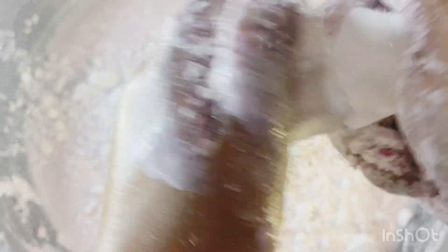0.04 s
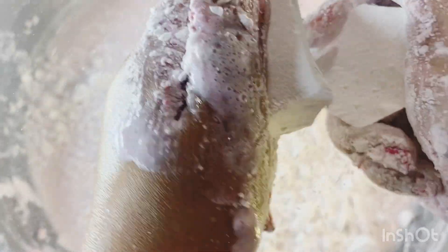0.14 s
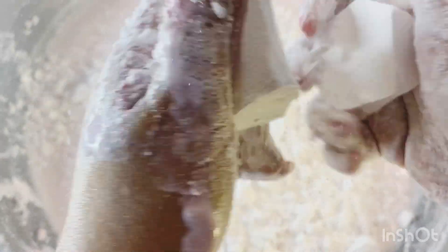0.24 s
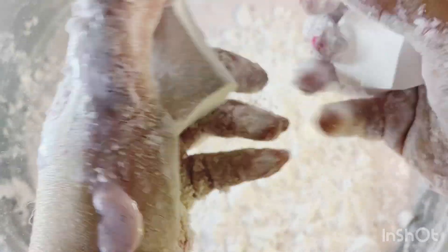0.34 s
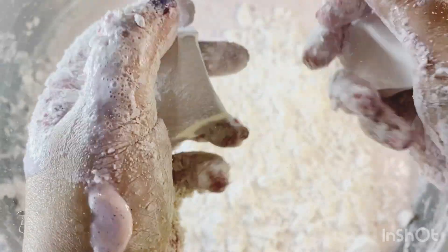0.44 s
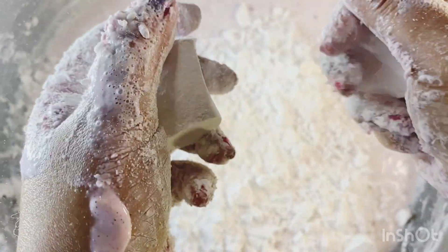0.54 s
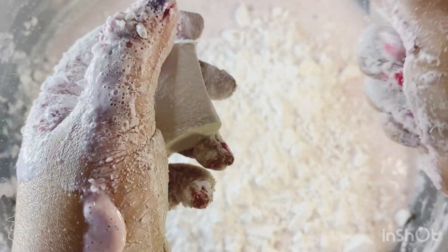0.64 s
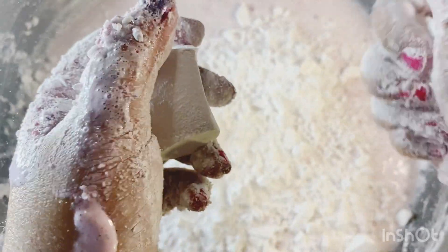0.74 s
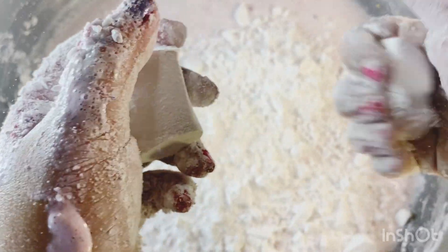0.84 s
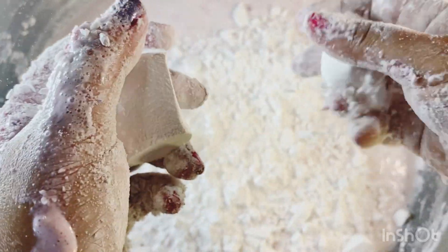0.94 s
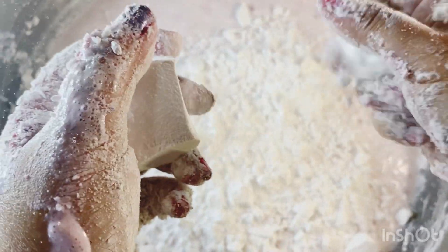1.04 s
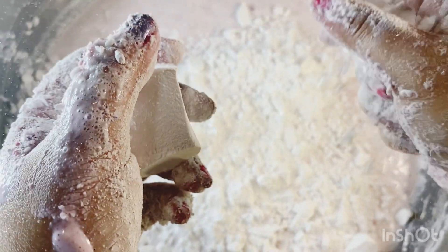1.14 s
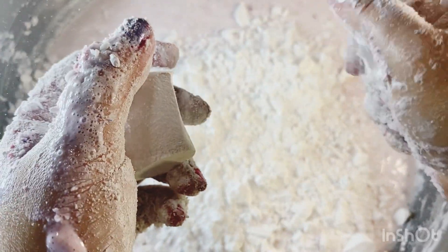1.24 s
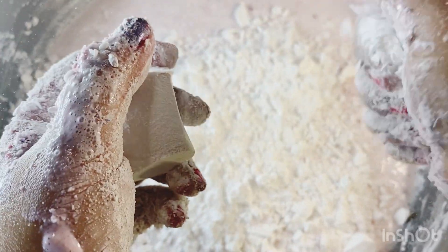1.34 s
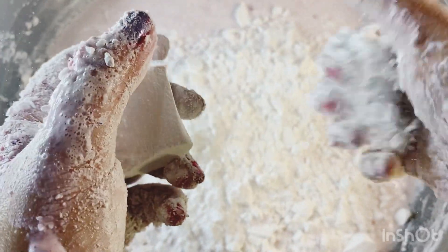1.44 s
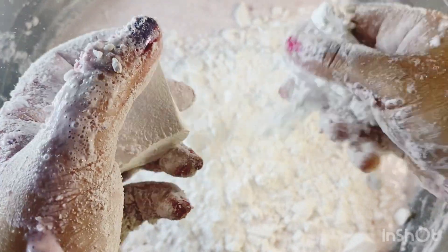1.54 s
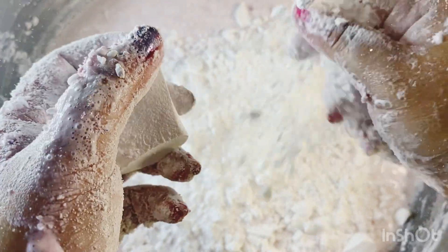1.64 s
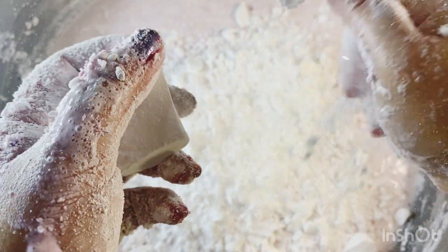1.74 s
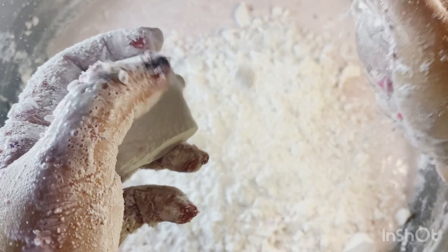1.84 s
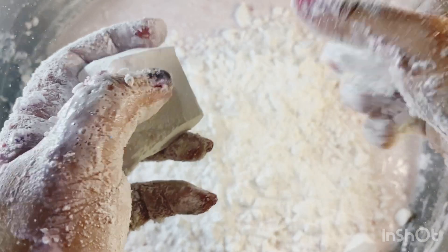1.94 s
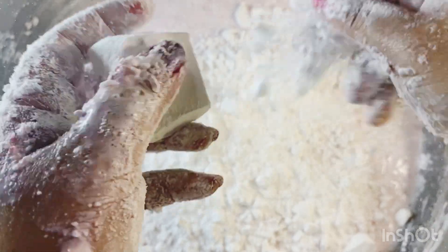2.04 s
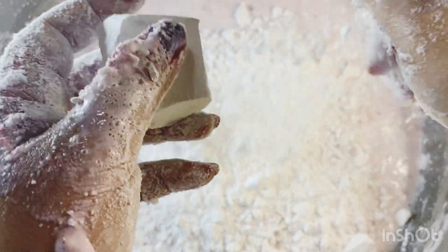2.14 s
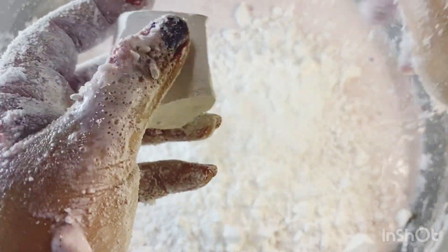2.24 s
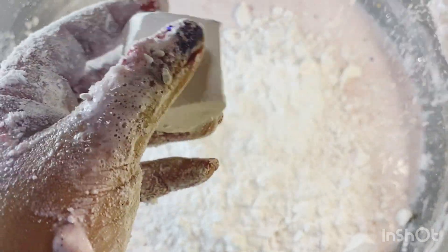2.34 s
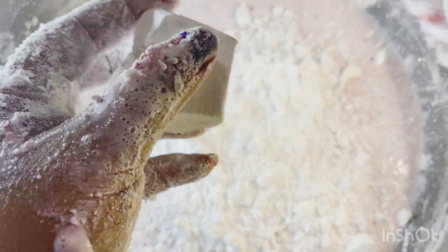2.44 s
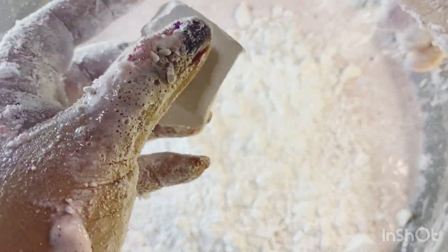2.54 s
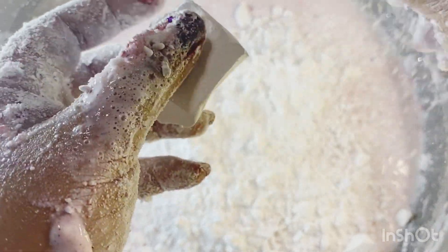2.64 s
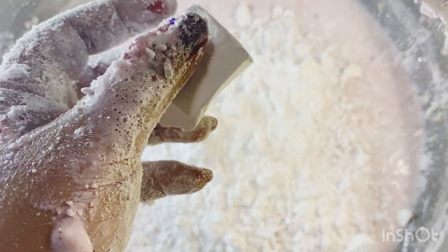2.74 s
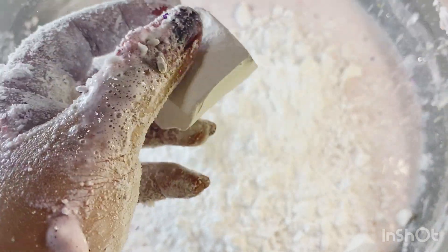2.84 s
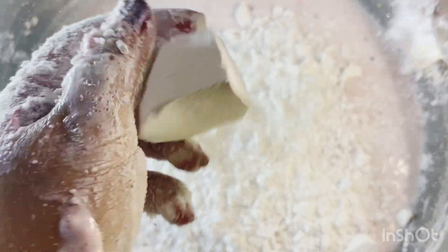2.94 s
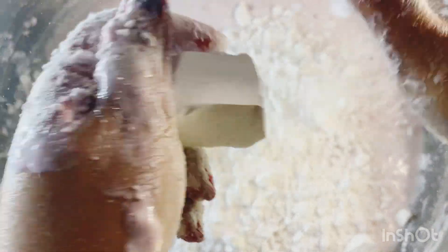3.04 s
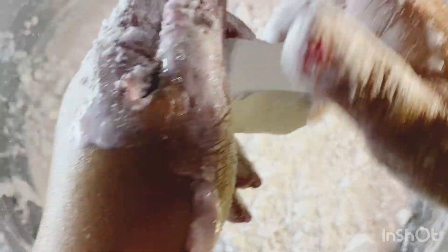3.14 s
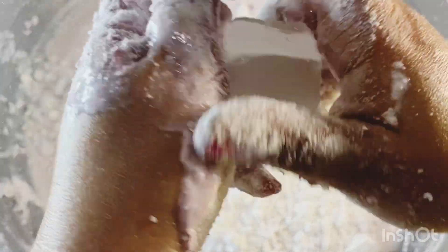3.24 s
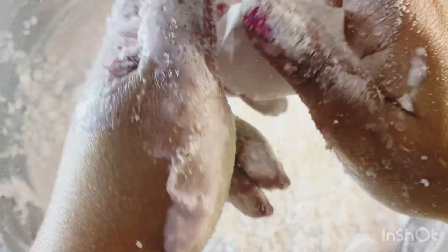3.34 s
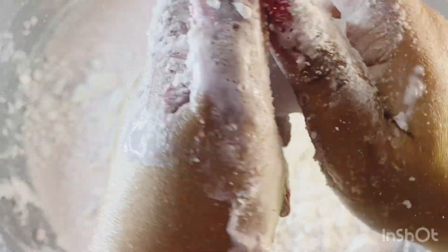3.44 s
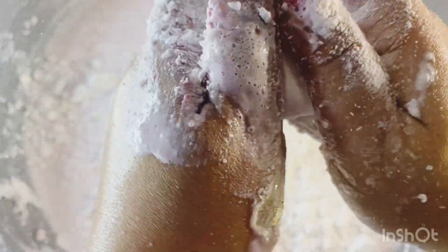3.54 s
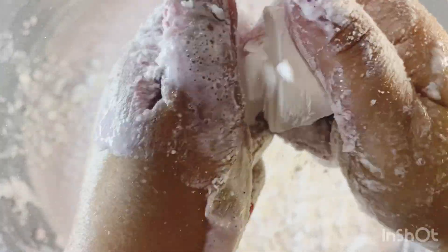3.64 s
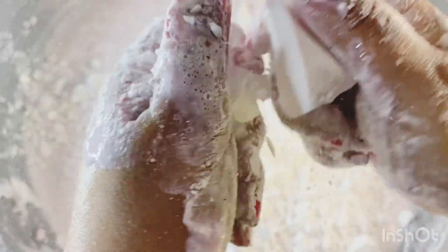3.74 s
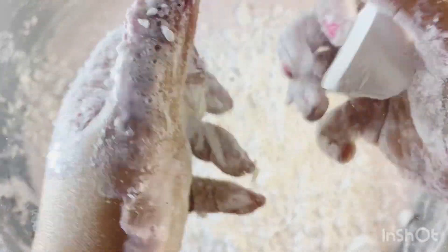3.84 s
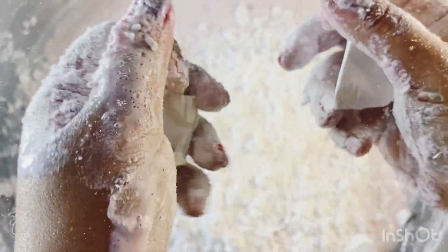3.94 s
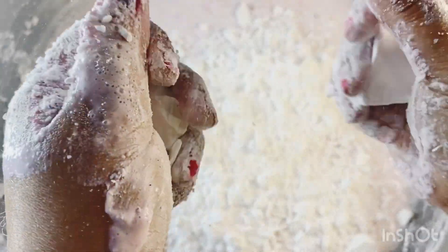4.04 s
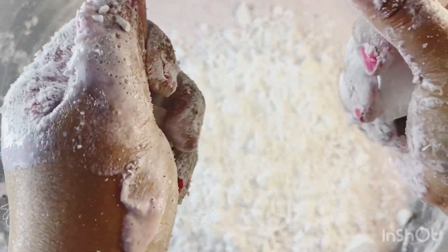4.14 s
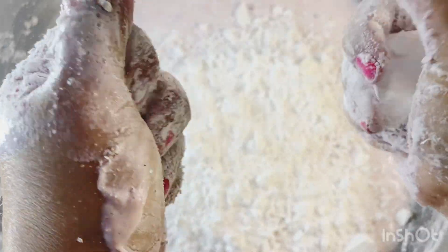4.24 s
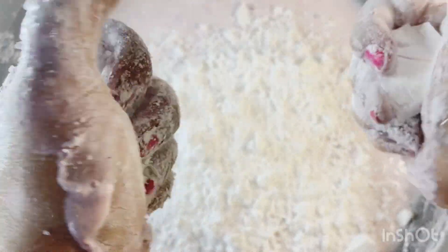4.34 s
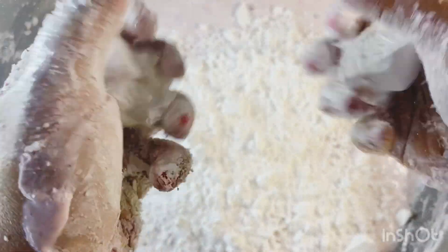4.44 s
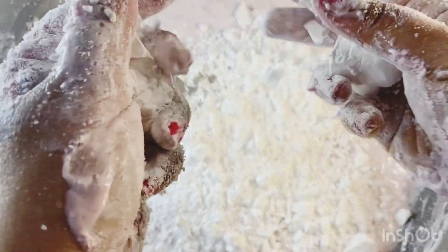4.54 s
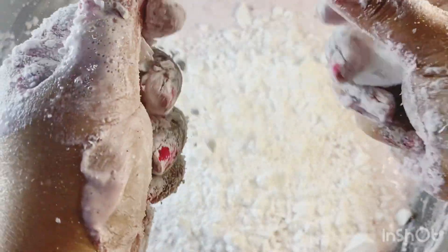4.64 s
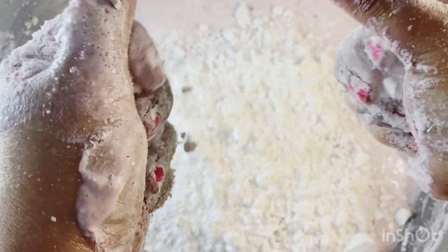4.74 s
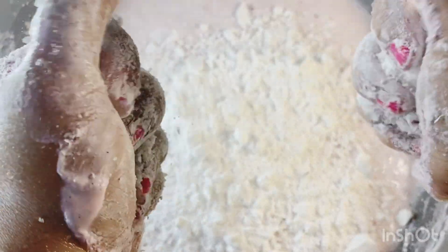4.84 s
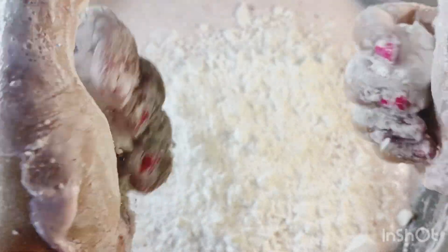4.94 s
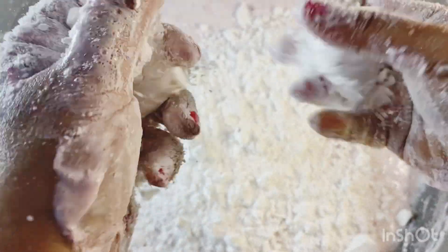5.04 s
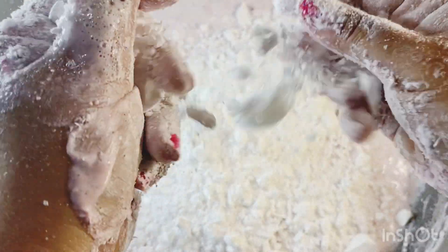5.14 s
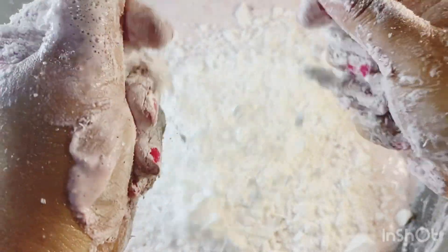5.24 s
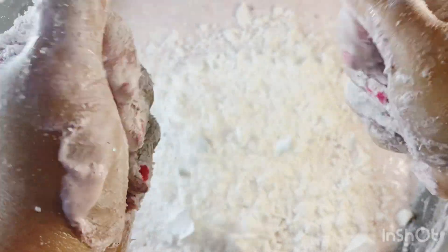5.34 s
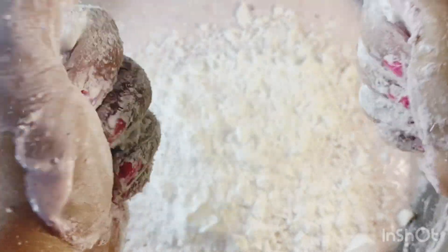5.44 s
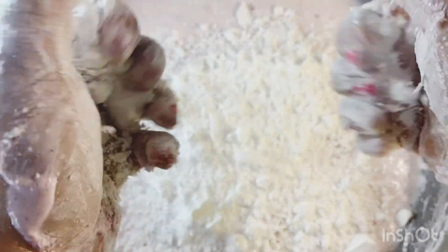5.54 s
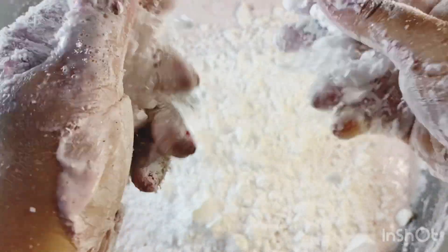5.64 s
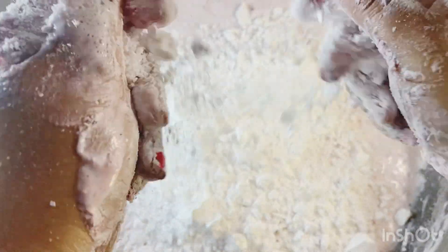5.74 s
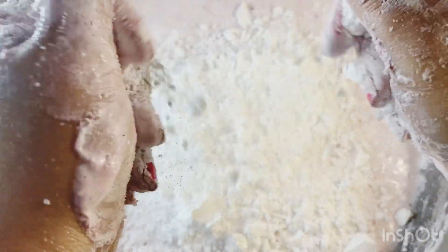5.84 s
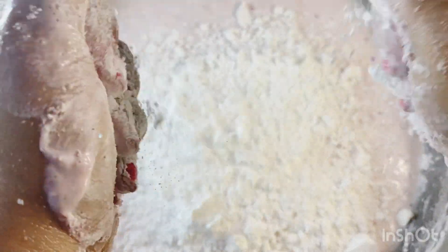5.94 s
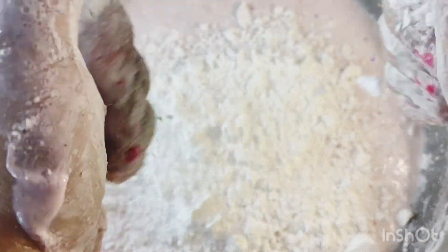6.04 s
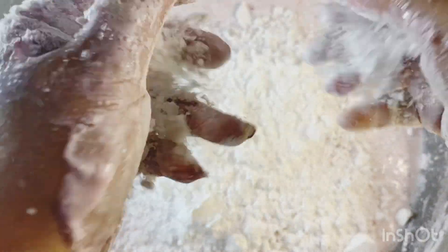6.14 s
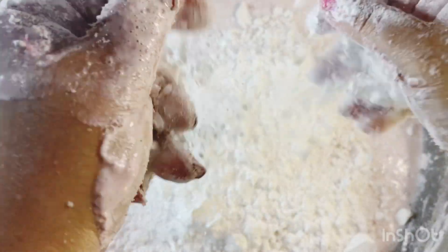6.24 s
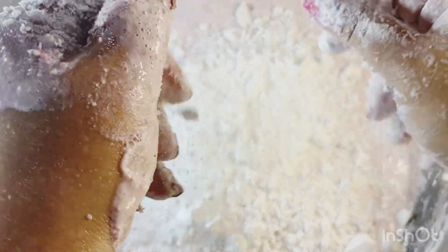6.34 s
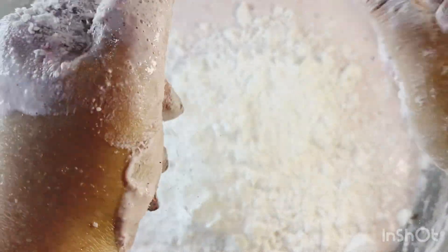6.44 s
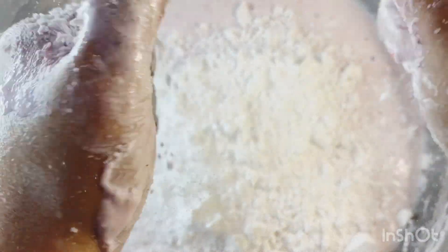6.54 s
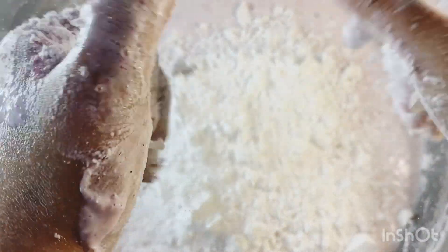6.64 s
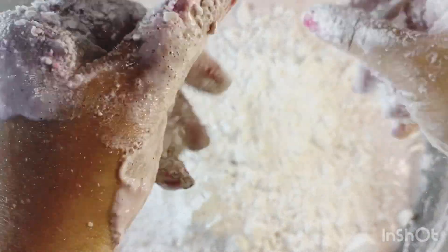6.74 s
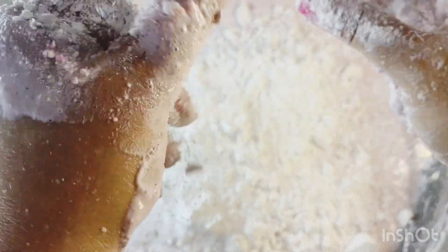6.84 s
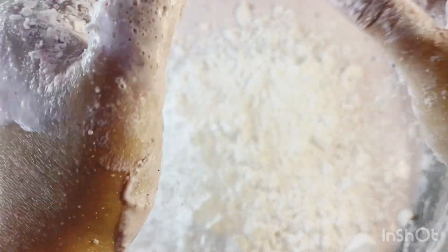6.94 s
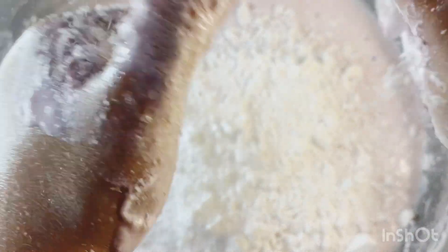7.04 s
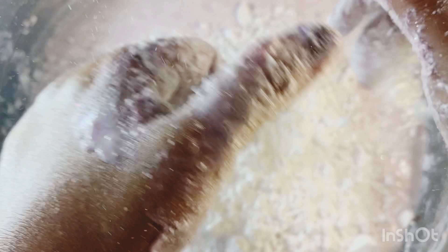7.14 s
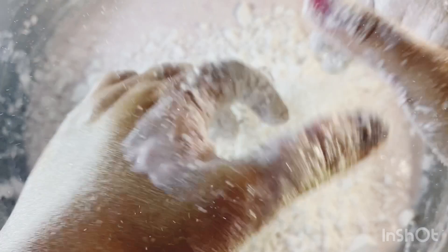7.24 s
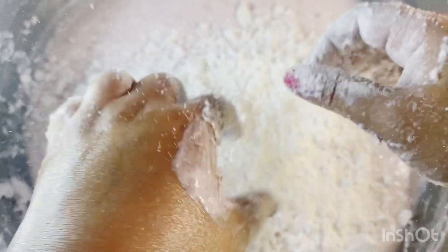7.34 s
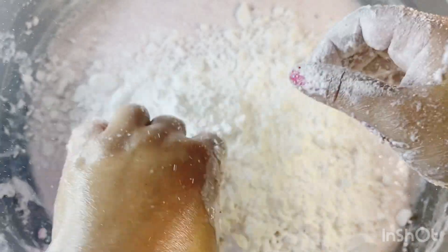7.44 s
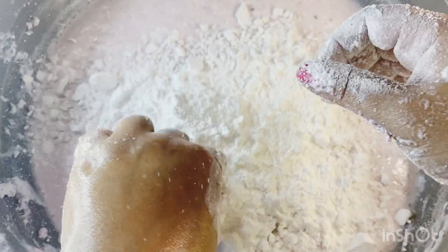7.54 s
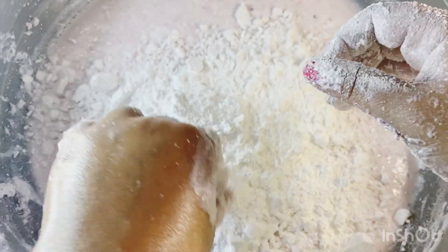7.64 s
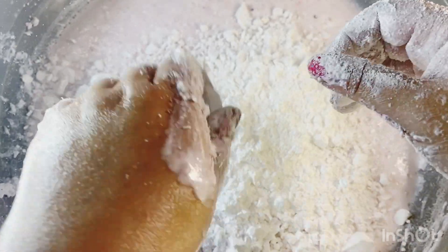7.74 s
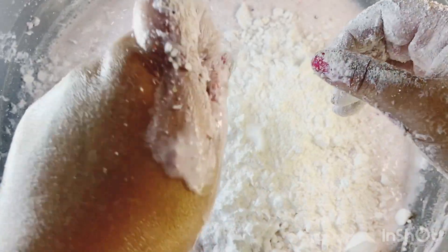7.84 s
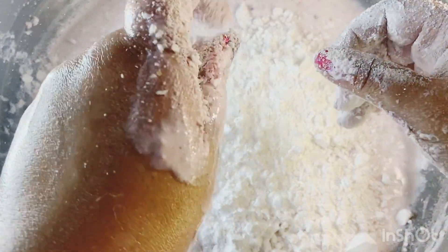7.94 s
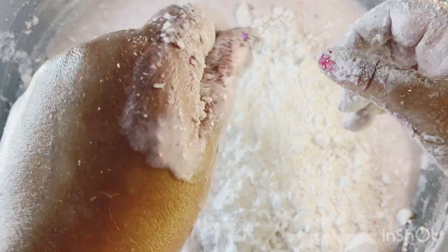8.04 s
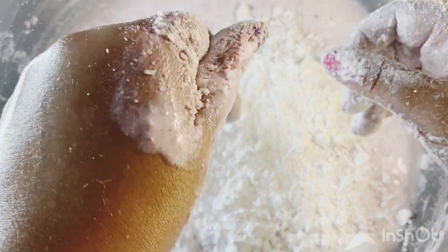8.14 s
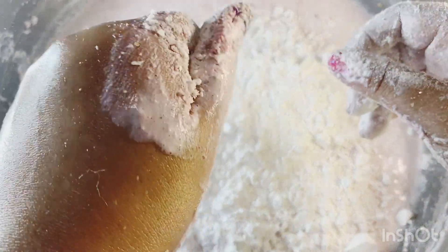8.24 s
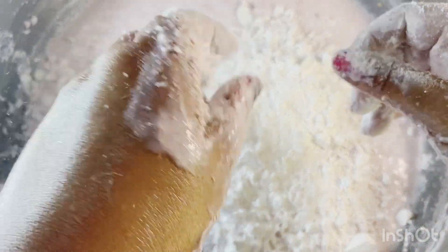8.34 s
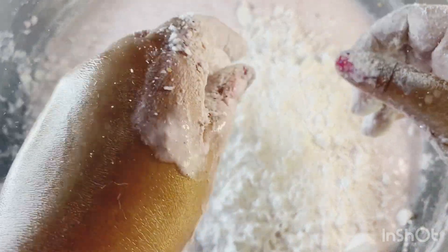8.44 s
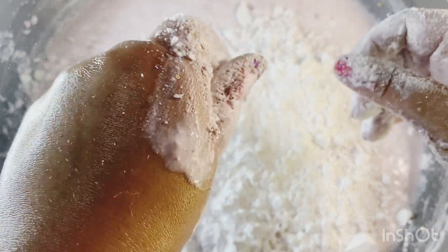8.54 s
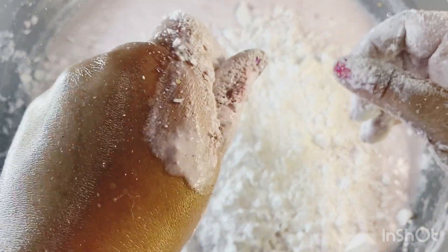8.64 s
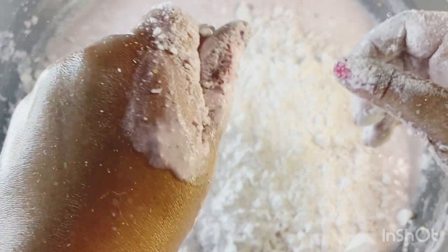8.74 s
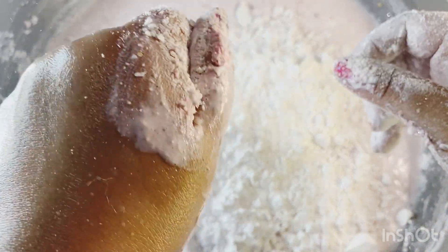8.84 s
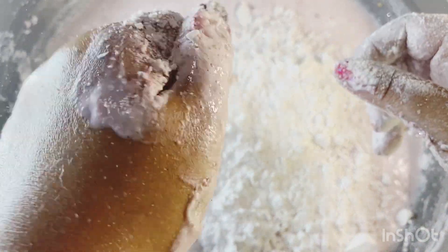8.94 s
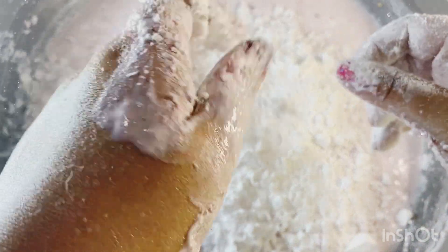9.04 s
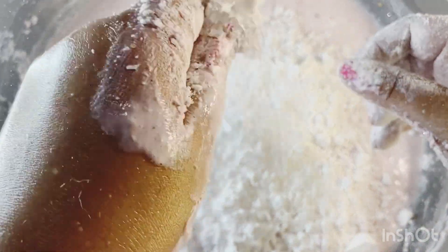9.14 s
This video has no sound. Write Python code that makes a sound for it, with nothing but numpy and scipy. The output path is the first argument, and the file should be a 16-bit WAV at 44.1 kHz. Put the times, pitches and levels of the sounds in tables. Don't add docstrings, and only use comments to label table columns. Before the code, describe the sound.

Close-up crunching of brittle chalk: a hard opening crack and bowl knock, scattered snaps, powdery rustling and falling crumbs, fading to faint grit in reverberation.

```python
import sys
import numpy as np
from scipy import signal
from scipy.fft import rfft, irfft, next_fast_len
from scipy.io import wavfile
from scipy.ndimage import uniform_filter1d

SR = 44100
rng = np.random.default_rng(int(sys.argv[2]) if len(sys.argv) > 2 else 0)


def linear_from_db(decibels):
    return 10 ** (np.asarray(decibels, float) / 20)


def waveform_to_disk(signal):
    frames = np.transpose(np.atleast_2d(signal))
    scaled = np.clip(frames, -1, 1) * 32767
    samples = np.round(scaled).astype(np.int16)
    wavfile.write(sys.argv[1], SR, samples)


N = 406161
LEAD = 4410


def rms_one(x):
    return x / np.sqrt(np.mean(x ** 2) + 1e-20)


def peak_one(x):
    return x / (np.max(np.abs(x)) + 1e-12)


def at_hz(points, hz, axis=1):
    points = np.array(points)
    return np.interp(np.log(hz), np.log(points[:, 0]), points[:, axis])


def ring(x, hz, t60):
    r, w = linear_from_db(-60 / (t60 * SR)), 2 * np.pi * hz / SR
    return signal.lfilter([0, np.sin(w)], [1, -2 * r * np.cos(w), r * r], x + 1e-18)


def stress(x, hz, width_hz, gain):
    r = np.exp(-np.pi * width_hz / SR)
    poles = [1, -2 * r * np.cos(2 * np.pi * hz / SR), r * r]
    resonance = signal.lfilter([(1 - r * r) / 2, 0, (r * r - 1) / 2], poles, x)
    return peak_one(x + gain * resonance)


def band(x, low_hz, high_hz, order=2):
    return signal.sosfilt(signal.butter(order, [low_hz, high_hz], "band", fs=SR, output="sos"), x)


def without_bass(x, hz, order):
    return signal.sosfilt(signal.butter(order, hz, "high", fs=SR, output="sos"), x)


def coloured(x, spectrum):
    size = next_fast_len(len(x))
    hz = np.maximum(np.arange(size // 2 + 1) * SR / size, 1)
    shaped = irfft(rfft(x, size) * linear_from_db(at_hz(spectrum, hz)), size)
    return rms_one(shaped[:len(x)])


def drift(rate_hz):
    r = np.exp(-2 * np.pi * rate_hz / SR)
    return rms_one(signal.lfilter([1], [1, -2 * r, r * r], rng.standard_normal(N + LEAD + SR))[SR:])


def add(track, s, sound):
    i = round(s * SR) + LEAD
    track[i:i + len(sound)] += sound[:len(track) - i]


def fractures():
    # t/s, ring level/dB, crack level/dB, ring f/Hz, crack f/Hz
    splits = [(-.05, -40, -30, 1650, 5890), (-.03, -7, -20, 2680, 9560), (-.0006, -8, -12, 1630, 9400),
              (0.0425, -11.5, -13, 2500, 3640), (0.5368, -26, -27.5, 2640, 9450),
              (1.0241, -26, -26.5, 2650, 8650), (1.042, -24, -24, 2520, 4250),
              (1.0977, -24, -21.5, 2880, 6300), (1.1183, -23.5, -30, 2870, 5300),
              (1.716, -30, -27, 2120, 6600), (2.2299, -25, -26, 2370, 6700),
              (2.6879, -28.5, -20, 3000, 6000), (3.5555, -25, -33.5, 2330, 3770),
              (3.566, -27, -19, 3370, 5400), (3.566, -29, -21, 2400, 9000), (4.1811, -25, -29, 1678, 6960),
              (4.1969, -26, -45, 1720, 7420), (4.7577, -35, -26, 1500, 4080),
              (5.3016, -28, -36, 2050, 6760), (5.7261, -40, -41, 2220, 4600),
              (5.8072, -22.5, -41, 1790, 3650), (5.8809, -31, -29.5, 1960, 8850),
              (8.1025, -42, -50, 1710, 7790), (8.634, -30, -23, 1980, 3730)]
    # t/s, ring level/dB, crack level/dB, ring f/Hz, crack f/Hz
    flakes = [(0.536, -36, -24, 2300, 6770), (0.5385, -28, -18.5, 2832, 6260), (.541, -23, -25, 2500, 6000),
              (.5559, -31, -22.5, 3540, 4160), (0.6382, -28.5, -23.5, 2780, 6360),
              (1.0197, -32, -32, 2570, 4300), (1.0568, -26, -49, 2800, 6420),
              (1.1492, -26, -26.5, 3000, 3560), (1.2117, -26, -20, 2720, 3960),
              (1.686, -30.5, -19, 3625, 8500), (4.0685, -33, -35, 2500, 7400),
              (4.5936, -24, -46, 2740, 3480), (4.7235, -28.5, -16.5, 2150, 6170),
              (4.758, -42, -28, 3000, 4500), (5.2035, -23, -16.5, 1950, 3450),
              (5.2674, -31, -31, 1140, 3530), (6.3504, -33, -18, 2680, 7770),
              (8.6368, -29, -26.5, 2980, 6950), (8.6367, -25, -19, 3450, 4300)]
    # t/s, body level/dB
    lumps = [(2.754, -36), (3.424, -41.5), (3.494, -38), (4.332, -36), (6.385, -44), (6.42, -45),
             (6.852, -44), (8.103, -51), (3.5647, -35), (4.072, -40), (5.4568, -39), (5.4829, -39),
             (5.4982, -19.5), (8.6323, -50), (8.6406, -39)]
    # t/s, level/dB, crack f/Hz
    even_chips = [(0.448, -34.5, 4120), (0.9691, -41, 5930), (1.0745, -31, 6050), (1.181, -36, 5680),
                  (1.281, -38, 6000), (1.3747, -35, 3500), (2.058, -29.5, 7830), (2.092, -36.5, 8570),
                  (2.099, -43, 3570), (2.5938, -37, 6200), (2.6431, -34, 8200), (3.0285, -43.5, 4940),
                  (3.268, -45, 6102), (3.4962, -35.5, 3470), (4.2078, -30.5, 8750), (4.2436, -35, 7180),
                  (6.8306, -35, 5070), (4.6974, -30, 4200), (4.74, -37, 6850), (4.956, -41, 7600),
                  (5.1532, -30, 6450), (5.159, -27.5, 4100), (5.2304, -31, 5700), (5.284, -36, 7560),
                  (5.34, -32, 3500), (5.379, -36, 7280), (5.395, -38, 8320), (5.689, -35, 7900),
                  (6.288, -29, 3580), (7.7377, -37.5, 3840)]
    # t/s, crack level/dB, crack f/Hz
    hard_splinters = [(1.1285, -22, 5570), (1.2025, -27, 7950), (2.0273, -38, 3660), (2.0512, -32, 6460),
                      (2.6005, -33, 6080), (2.635, -23.5, 8950), (3.024, -37.5, 3540), (4.076, -31, 4340),
                      (4.193, -23.5, 9300), (4.222, -32, 4290), (4.252, -30, 8200), (4.4893, -36.5, 5640),
                      (4.5679, -29.5, 3576), (4.5961, -26, 8680), (4.6793, -37, 6130), (4.834, -34, 4310),
                      (5.1292, -32, 4400), (5.3261, -26.5, 8050), (5.716, -38, 5900), (5.739, -35, 3630),
                      (5.798, -26, 8400), (5.8306, -31, 10800), (6.0106, -38, 5900), (6.1445, -35.5, 6140),
                      (6.241, -42, 6120), (6.302, -38, 5850)]
    # t/s, crack level/dB
    grit = [(1.085, -28), (1.2549, -31), (1.6456, -42), (1.663, -25.5), (2.1271, -46), (3.5633, -23),
            (4.072, -24), (4.6918, -32.5), (4.733, -27), (4.865, -37), (5.264, -41), (5.3449, -30),
            (5.444, -34), (5.7076, -31), (5.858, -40), (6.203, -53), (6.7703, -45), (6.8063, -40),
            (4.3016, -41), (6.8475, -38), (7.0898, -42.5), (7.178, -35), (7.1932, -34), (7.25, -34.5),
            (7.291, -39.5), (7.7244, -42), (7.735, -28), (8.5376, -54)]
    # t/s, ring level/dB
    dull_crumbs = [(1.3285, -36.5), (1.5753, -36), (1.631, -36.5), (1.7429, -39), (1.8596, -33.5),
                   (4.057, -33), (4.145, -44.5), (4.629, -38), (4.77, -37), (5.1491, -35), (5.2124, -26.5),
                   (5.24, -29.5), (5.292, -37), (5.322, -30), (5.43, -40.5), (5.749, -36), (5.826, -28),
                   (5.8438, -31.5), (7.0844, -42.5), (8.0727, -54), (8.273, -46), (8.463, -55)]
    grit_hz, chip_ring_hz = 7790, 2500

    chips = [(s, db, db, hz) for s, db, hz in even_chips]
    chips += [(s, db - 9, db, hz) for s, db, hz in hard_splinters]
    chips += [(s, db - 11, db, grit_hz) for s, db in grit]
    chips += [(s, db, db - 7.5, 4500) for s, db in dull_crumbs]
    spread = np.clip(rng.standard_normal((len(chips), 2)), -2, 2)

    rows = [(s, ring_db - 5, ring_db, *rest) for s, ring_db, *rest in splits]
    rows += [(s, ring_db - 20.5, ring_db, *rest) for s, ring_db, *rest in flakes]
    rows += [(s, db, db - 28, db - 16, 1700, grit_hz) for s, db in lumps]
    for (s, ring_db, crack_db, crack_hz), (c_ring, c_crack) in zip(chips, spread):
        ring_hz = chip_ring_hz * 1.3 ** c_ring
        rows.append((s, ring_db - 14.5, ring_db, crack_db, ring_hz, crack_hz * 1.03 ** c_crack))
    return rows


def snaps():
    out, t = np.zeros(N + LEAD), np.arange(2600) / SR
    rows = fractures()
    noise, draw = rng.standard_normal((len(rows), 2, 2600)).transpose(1, 0, 2)
    bursts = (t == 0) + 0.098 * noise * np.exp(-t / 0.0012)
    splinters = noise * (draw > 1.7) * np.exp(-t / .016) * (t > .0015)
    body = -band(bursts, 240, 1300)
    low, high = band(bursts, 1000, 3500), band(bursts, 3900, 12000)
    low_tail, high_tail = band(splinters, 1100, 4100), band(splinters, 2800, 8400)
    for k, (s, body_db, ring_db, crack_db, ring_hz, crack_hz) in enumerate(rows):
        block_ring = stress(low[k], ring_hz, 470, gain=15.0) + linear_from_db(-16.0) * low_tail[k]
        crack = stress(high[k], crack_hz, 900, gain=3.23) + linear_from_db(-12.5) * high_tail[k]
        sound = linear_from_db(body_db + 4.0) * peak_one(body[k])
        sound += linear_from_db(ring_db + 4.0) * block_ring + linear_from_db(crack_db + 9.5) * crack
        add(out, s, sound)
    out = without_bass(out, 260, order=3)
    dull = signal.sosfilt(signal.butter(2, 9200, fs=SR, output="sos"), out)
    return dull + linear_from_db(-4) * (out - dull)


def pieces():
    # f/Hz, width/Hz, level/dB
    CORNER = [(980, 660, -10.0), (1500, 210, -25.5), (2300, 210, -12.5), (2720, 96, -16.5),
              (2960, 140, -19.5), (4040, 400, -16), (5020, 130, -29.5), (5910, 350, -14.5),
              (6770, 1800, -6), (9470, 490, -7), (12850, 860, -18.5)]
    WEDGE = [(1260, 220, -22), (1760, 500, -23), (2600, 280, -14.5), (4320, 450, -16.5), (4940, 180, -25),
             (6060, 300, -19.0), (6690, 1350, -13.5), (8800, 1310, -14), (14000, 610, -43)]
    HALF = [(760, 340, -9), (1690, 330, -7.5), (2210, 260, -3), (2600, 420, -2.0), (3940, 430, -15.5),
            (5890, 910, -12.5), (9450, 920, -16.5), (12380, 1530, -19)]
    CORE = [(1340, 720, -20.5), (2290, 190, -17.5), (2480, 1300, -9.5), (3340, 350, -11.5),
            (5410, 800, 0.5), (6170, 640, -5.0), (7195, 330, -11), (8490, 430, -8), (9150, 770, -8.5),
            (14560, 7800, -8)]
    SHARD = [(1040, 900, -24), (2500, 340, -24), (3720, 580, -20.5), (5670, 320, -20.5), (7270, 660, -15),
             (8530, 610, -17), (9500, 470, -25.5), (12200, 2010, -25)]
    SLIVER = [(1150, 370, -21), (1720, 230, -25), (3000, 2000, -8.5), (4260, 510, -8.5), (5760, 520, -21),
              (6550, 1100, -12), (8100, 1330, -3), (9810, 1100, -23), (11700, 520, -23.5)]
    NUGGET = [(1205, 160, -32.0), (2210, 126, -31), (3220, 480, -28.5), (4610, 130, -38),
              (6100, 4600, -16.5), (10080, 5800, -18)]
    LAST_BIT = [(480, 135, -28.0), (1208.4, 200, -25), (1917, 144, -16.5), (2570, 260, -15),
                (2970, 117, -17.5), (3550, 170, -18), (4220, 380, -15), (5550, 490, -14.5),
                (6600, 620, -11.5), (8540, 970, -11), (10200, 260, -24), (12070, 730, -16)]
    # t/s, modes
    big_pieces = [(-.035, [(900, 580, -1), (1650, 180, -4.5), (2500, 470, 2.5), (3200, 530, -2.5)]),
                  (0.5367, CORNER), (1.0208, WEDGE), (3.5559, HALF), (3.566, CORE), (4.0687, SHARD),
                  (4.7577, SLIVER), (5.7259, NUGGET), (8.634, LAST_BIT)]
    # t/s, f/Hz, width/Hz, level/dB
    fragments = [(0.83, 460, 39, -43), (.82, 290, 33, -44), (3.76, 420, 50, -44), (3.808, 465, 16, -42),
                 (3.815, 280, 21, -43.5), (3.86, 310, 26, -44), (3.935, 280, 30, -42.5),
                 (5.405, 396, 27, -47), (5.44, 440, 23, -39.5), (8.103, 1350, 1300, -29.5),
                 (5.776, 8500, 2800, -30), (5.7915, 6000, 1640, -34), (5.8515, 9200, 2500, -34),
                 (5.908, 7500, 2770, -32), (5.926, 7000, 3300, -38), (6.047, 2700, 760, -41),
                 (6.057, 2330, 700, -39), (4.7, 12500, 4000, -34), (8.006, 2600, 900, -48),
                 (8.405, 2300, 1500, -48), (8.392, 6500, 1100, -47.5), (8.6326, 2500, 700, -37),
                 (8.64, 2000, 1200, -13.5), (4.7698, 5200, 1500, -24), (4.7655, 7800, 2500, -20),
                 (8.463, 2000, 2100, -38), (8.483, 6500, 2500, -44), (8.432, 7000, 2500, -48),
                 (7.287, 7500, 2500, -44), (7.514, 6000, 2500, -48), (4.325, 920, 400, -35),
                 (.163, 640, 170, -21), (5.121, 9000, 3000, -34), (5.455, 375, 22, -31),
                 (-.01, 9400, 500, -22), (5.485, 1000, 300, -27), (.194, 12400, 1200, -30),
                 (.466, 6500, 3500, -34), (.89, 4000, 3500, -36), (.359, 9000, 4000, -36),
                 (6.292, 10000, 4000, -32), (3.622, 2300, 400, -28), (3.631, 8800, 2000, -24.5),
                 (3.6435, 6000, 900, -25), (3.644, 7800, 1000, -20), (3.657, 2300, 460, -27),
                 (5.431, 7000, 3000, -35), (5.4845, 9000, 4000, -32), (4.6, 9500, 3500, -28),
                 (4.2437, 12500, 3500, -27), (5.8072, 12500, 3500, -30), (5.8809, 12500, 3500, -28),
                 (2.1, 12500, 3500, -32.5)]
    tear_s = 3e-5
    out, tear = np.zeros(N + LEAD), np.exp(-np.arange(6000) / SR / tear_s)
    for s, modes in big_pieces + [(s, [note]) for s, *note in fragments]:
        sound = 0
        for k, (hz, width_hz, db) in enumerate(modes):
            t60 = np.log(1000) / (np.pi * width_hz)
            sound = sound + (-1) ** k * linear_from_db(db) * ring(tear, hz, t60)
        add(out, s, sound)
    return without_bass(out, 260, order=3)


def knocks():
    # t/s, peak level/dB, bowl f/Hz
    bowl_hits = [(.163, -7, 413), (.176, -2.5, 350), (.197, -19.5, 346), (.535, -21, 414.2),
                 (0.791, -36, 299.4), (1.292, -32.5, 483), (2.753, -31.5, 465), (3.398, -36.5, 524),
                 (3.425, -29.5, 397.6), (3.493, -29.5, 715), (3.555, -10.5, 390), (3.611, -26.5, 323),
                 (3.655, -30, 393), (4.18, -27.5, 383), (4.299, -33, 390), (4.317, -32.5, 350.6),
                 (4.33, -27.5, 480), (4.874, -23.5, 371), (4.884, -34, 355), (5.381, -34, 390),
                 (5.433, -24, 390), (5.453, -28, 375), (5.474, -27, 394), (5.484, -13.5, 405),
                 (5.497, -16, 415), (5.511, -35, 383)]
    # pitch ratio, level/dB, t60/s
    bowl_modes = [(0.621, -23, 0.1), (0.822, -14, 0.029), (1, 2.5, 0.041), (1.85, -13, 0.055),
                  (2.798, -11, .02)]
    # t/s, peak level/dB
    shoves = [(0.002, -12.5), (0.539, -20.5), (1.025, -26.5), (2.689, -37.5), (3.4, -38), (3.43, -38),
              (3.558, -17.5), (4.35, -33)]
    out, t = np.zeros(N + LEAD), np.arange(5000) / SR
    contact = np.sin(np.pi * np.minimum(t / 0.00042, 1))
    thud = 0.18 * peak_one(band(contact, 570, 1600, order=3))
    chances = rng.standard_normal((len(bowl_hits), len(bowl_modes)))
    for (s, peak_db, hz), chance in zip(bowl_hits, chances):
        modes = sum(linear_from_db(db + 2 * c) * ring(contact, hz * ratio, t60)
                    for (ratio, db, t60), c in zip(bowl_modes, chance))
        add(out, s + 0.00084, linear_from_db(peak_db - 4.5) * peak_one(peak_one(modes) + thud))
    out = without_bass(out, 190, order=2)
    push = peak_one(ring(contact, 36, 0.059) + 0.45 * ring(contact, 115, 0.047))
    for s, peak_db in shoves:
        add(out, s, linear_from_db(peak_db - 2.5) * push)
    return out


def after_spills(db, fade_share, extra_db):
    # t/s, level/dB, fade/s
    spills = [(-.04, -39, 0.15), (1.02, -41, 0.17), (3.556, -36, 0.27), (5.189, -42, 0.17),
              (6.3, -49, 0.095), (6.49, -55, 0.032), (6.72, -52, 0.044), (8.634, -56, 0.18)]
    attack_s = 0.012
    t, total = (np.arange(N + LEAD) - LEAD) / SR, linear_from_db(db)
    for s, top_db, fade_s in spills:
        u = np.clip(t - s, 0, 2)
        swell = (1 - np.exp(-u / attack_s)) * np.exp(-u / (fade_s * fade_share))
        total = total + linear_from_db(top_db + extra_db) * swell
    return 20 * np.log10(total)


def hands():
    # t/s, powder rustle level/dB, grip rumble level/dB
    handling = [(0, -55, -65), (.5, -54, -42), (0.999, -54.5, -53), (1.45, -67, -56), (1.68, -50, -50),
                (2.05, -64.5, -53), (2.201, -54, -50), (2.55, -65, -47), (2.85, -57.5, -60),
                (3.4, -71, -47.5), (4.1, -55, -45.5), (4.4, -59, -57), (4.65, -48, -45.5),
                (5.5, -63.5, -55), (5.75, -55, -50), (6.65, -62.5, -54), (7.7, -75, -62.5),
                (9.21, -67, -61)]
    # f/Hz, level/dB
    powder_colour = [(500, -15.5), (1200, -4.5), (2400, 3.5), (4000, -4), (7500, -1.5), (9800, -3),
                     (11000, -20), (15000, -24)]
    grains_per_s, crumbs_per_s = 6000, 77
    s, *columns = np.transpose(handling)
    t = (np.arange(N + LEAD) - LEAD) / SR
    powder_db, rumble_db = [np.interp(t, s, c) for c in columns]
    powder_db = after_spills(powder_db, 0.93, 0)
    rumble_db = after_spills(rumble_db, .4, 5)

    draw, sign = rng.random((2, N + LEAD)), rng.choice([-1, 1], N + LEAD)
    sizes = linear_from_db(4.3 * np.minimum(rng.exponential(1, N + LEAD), 4.5)) * sign
    grains = sizes * (draw[0] < grains_per_s / SR)
    powder = coloured(grains, powder_colour) * linear_from_db(powder_db - 3.0 + 2.5 * drift(25))

    born, dealt = draw[1] < crumbs_per_s / SR, rng.integers(0, 8, N + LEAD)
    crumbs = sum(ring(sizes * born * (dealt == k), hz, 3.5 / hz)
                 for k, hz in enumerate(np.geomspace(1300, 9500, 8)))
    crumbs = band(crumbs, 900, 10000) * linear_from_db(powder_db + 8.0)

    rumble = rms_one(band(rng.standard_normal(N + LEAD), 7.5, 58)) * linear_from_db(rumble_db - 6.0 + 2.5 * drift(2.9))
    return powder + crumbs, rumble


def rubs():
    # t/s, length/s, f/Hz, level/dB
    strokes = [(1.045, .13, 4200, -45), (3.58, .2, 4600, -43), (3.424, .02, 1100, -52),
               (4.27, .035, 2000, -50), (4.315, .04, 950, -48), (4.545, .04, 4000, -51),
               (4.595, .03, 3000, -48), (4.935, .035, 2300, -49), (5.07, .06, 2500, -54),
               (5.205, .06, 4200, -46), (5.33, .06, 2200, -50), (6.04, .03, 1800, -55),
               (6.045, .04, 4500, -54), (6.355, .5, 8000, -59), (6.915, .025, 1400, -62),
               (6.97, .05, 1300, -62), (6.97, .06, 6500, -60), (6.98, .12, 2500, -62),
               (7.215, .04, 3500, -63), (7.365, .045, 1900, -62), (7.44, .08, 2000, -64),
               (7.98, .08, 7200, -64), (8.09, .07, 6800, -62), (8.0, .07, 2500, -65),
               (8.068, .085, 1900, -61), (8.245, .04, 6800, -61)]
    grains_per_s, grain_db = 1500.0, 4.5
    span, skew = 1.17, .55
    out, t = np.zeros(N + LEAD), np.arange(SR // 2) / SR
    draw = rng.random((len(strokes), 3, SR // 2))
    for (s, length_s, hz, db), (born, size, sign) in zip(strokes, draw):
        grains = (born < grains_per_s / SR) * linear_from_db(-grain_db * np.log(size + .01)) * np.sign(sign - .5)
        arch = np.sin(np.pi * np.clip(t / length_s, 0, 1) ** skew)
        swell = np.sqrt(np.maximum(arch, 0))
        add(out, s, linear_from_db(db) * swell * rms_one(band(grains, hz / span, hz * span)))
    return out


def background():
    # f/Hz, level/dB
    hiss_colour = [(15, -30.5), (25, -2.5), (76, -25.5), (127, -13), (166, -7), (242, 0), (476, -4.5),
                   (1480, -15.5), (2110, -14), (4370, -17), (6920, -16.5), (14000, -19.5), (16000, -34.5)]
    # f/Hz, width/Hz, level/dB
    machinery = [(119, 15, -70), (222, 28, -82)]
    white = rng.standard_normal((2, N + LEAD))
    hum = sum(linear_from_db(db) * rms_one(band(white[1], hz - width / 2, hz + width / 2))
              for hz, width, db in machinery)
    return linear_from_db(-61) * coloured(white[0], hiss_colour) + hum


def room(x):
    t60_s, wash_db, cut_hz = 0.18, -15.5, 3600
    t = np.arange(9000) / SR
    wash = rng.standard_normal(9000) * linear_from_db(-60 * t / t60_s) * (1 - np.exp(-t / 0.00052))
    wash = signal.lfilter(*signal.butter(1, cut_hz, fs=SR), wash)
    return x + linear_from_db(wash_db) * signal.fftconvolve(x, wash / np.linalg.norm(wash))[:len(x)]


def hall(x):
    # f/Hz, level/dB, t60/s
    decay = [(30, 4, 1.8), (119.7, 6, 0.56), (330, 1, 3.4), (930, 3, 2.4), (3000, 1.5, 2.56),
             (6760, -0.5, 1.6), (10600, 11.5, 2)]
    tail_db, delay_s, cut_hz = -14, 0.051, 10250
    t, white, tail = np.arange(3 * SR) / SR, rng.standard_normal((2, 2, 3 * SR)), 0
    for k, hz in enumerate(32.24 * 2. ** np.arange(9)):
        octave = band(white[k % 2], hz / np.sqrt(2), hz * np.sqrt(2))
        tail = tail + octave * linear_from_db(at_hz(decay, hz) - 60 * t / at_hz(decay, hz, axis=2))
    tail = tail * (1 + 0.5 * np.exp(-t / 0.02))
    tail = signal.sosfilt(signal.cheby2(16, 34, cut_hz, fs=SR, output="sos"), tail)
    tail = np.pad(tail / np.linalg.norm(tail[0]), ((0, 0), (round(delay_s * SR), 0)))
    return linear_from_db(tail_db) * signal.fftconvolve(x[None], tail, axes=1)[:, :len(x)]


def scene():
    rustle, rumble = hands()
    near = room(snaps() + pieces() + knocks() + rustle) + rumble + background()
    tail = hall(near)
    return (near + rubs() + tail)[:, LEAD:]


def starved(x):
    from_hz, threshold_db, spread_db = 10300, -17.5, 2.5
    hz, _, z = signal.stft(x, SR, nperseg=2048, noverlap=1024)
    power = np.mean(np.abs(z) ** 2, axis=0)
    below = power[(hz > 6000) & (hz < 9800)].mean(axis=0)
    bands = np.repeat(power[:1024].reshape(64, 16, -1).mean(axis=1), 16, axis=0)
    luck = uniform_filter1d(rng.standard_normal((64, len(below))), size=2, axis=1)
    luck = np.repeat(luck, 16, axis=0)
    bin_hz = hz[:1024, None]
    slope_db = -1.9 * (bin_hz - from_hz) / 1000
    limit = below * linear_from_db(2 * (threshold_db + slope_db + spread_db * luck))
    silent = (bands < limit) & (bin_hz > from_hz)
    z[:, :1024] *= ~silent
    return signal.istft(z, SR, nperseg=2048, noverlap=1024)[1][:, :N]


def band_limit(x):
    return signal.sosfilt(signal.butter(12, 16750, fs=SR, output="sos"), x)


def record(dry):
    clipped = np.clip(dry, -1, 1)
    cut = signal.sosfilt(signal.cheby2(14, 70, 16600, fs=SR, output="sos"), clipped)
    mix = starved(cut)
    return band_limit(mix)


dry = scene()
out = record(dry)
waveform_to_disk(out)
```